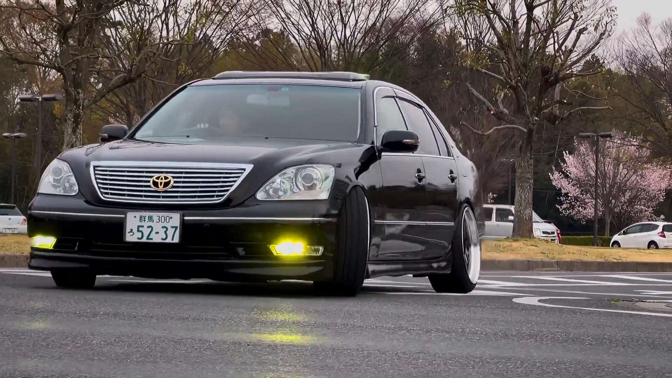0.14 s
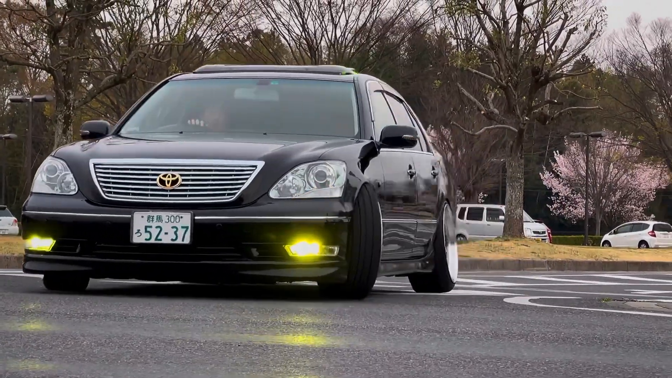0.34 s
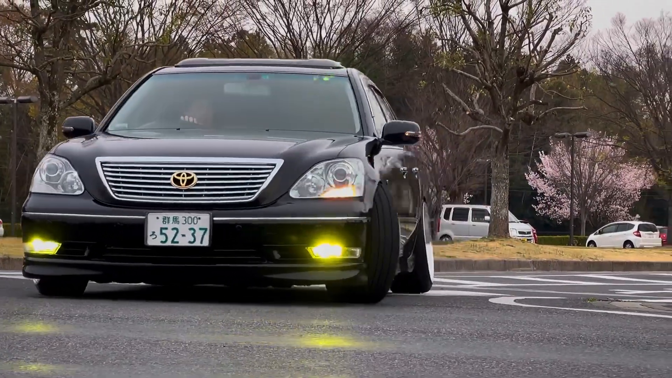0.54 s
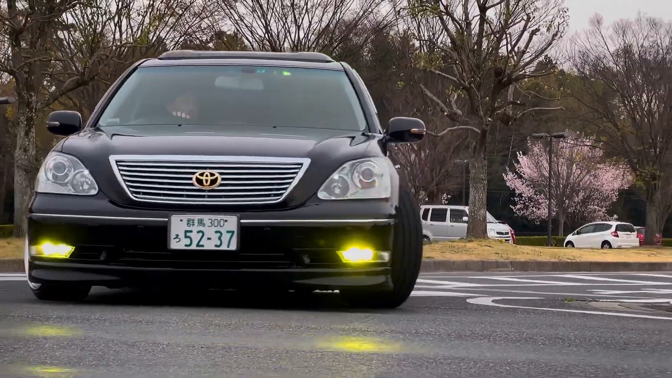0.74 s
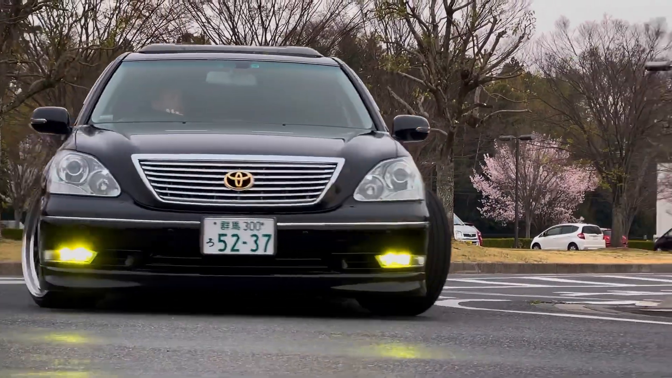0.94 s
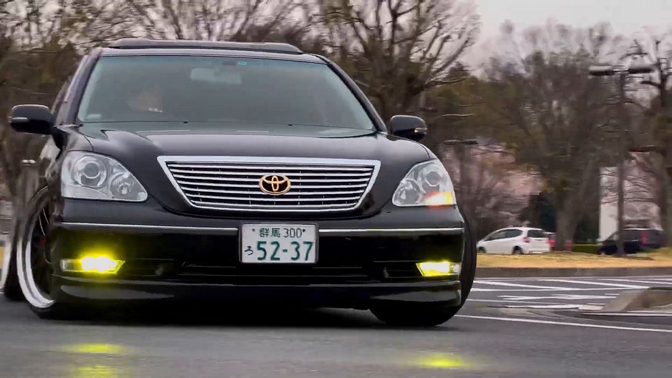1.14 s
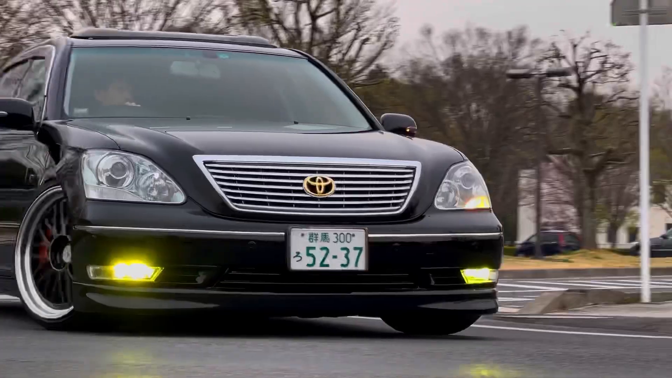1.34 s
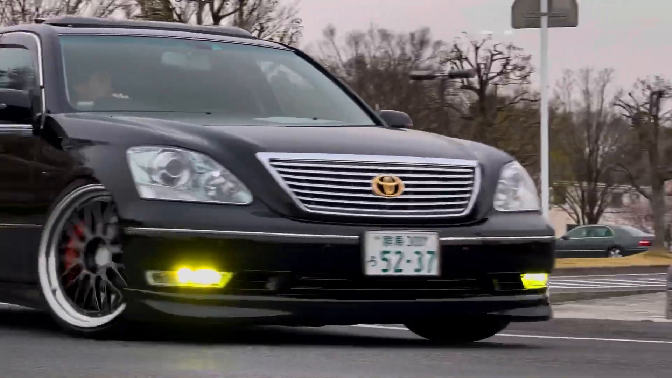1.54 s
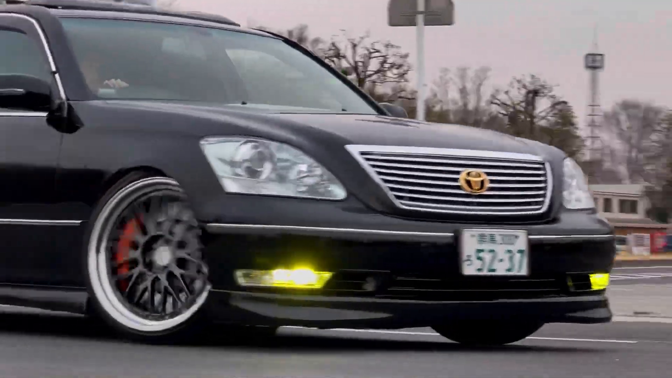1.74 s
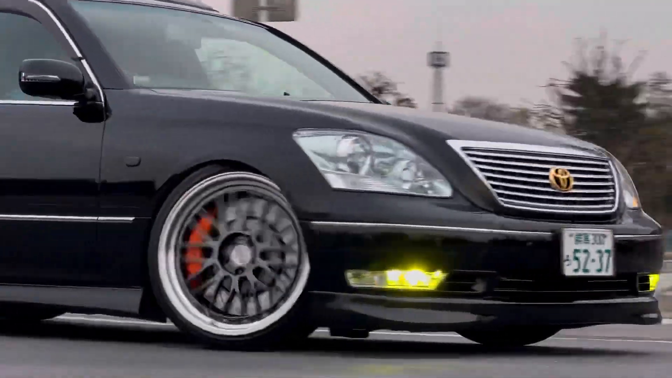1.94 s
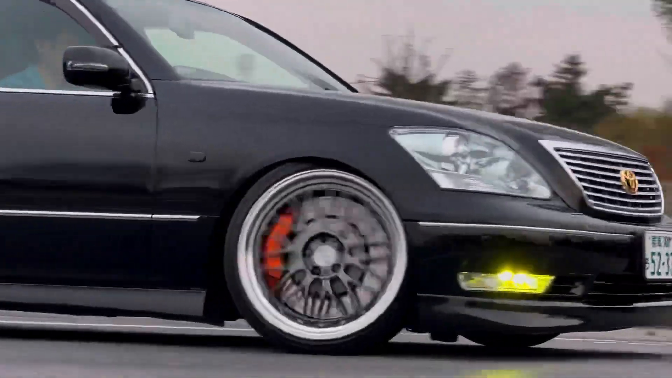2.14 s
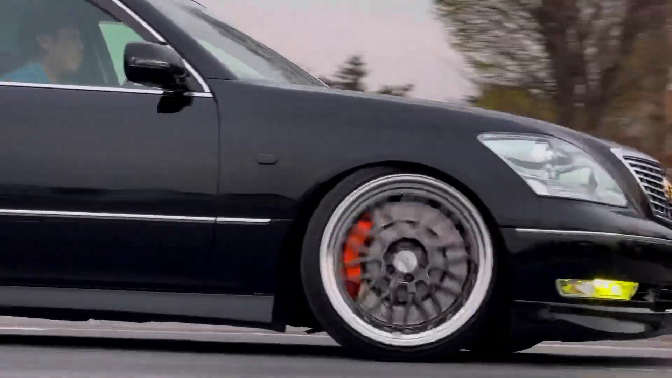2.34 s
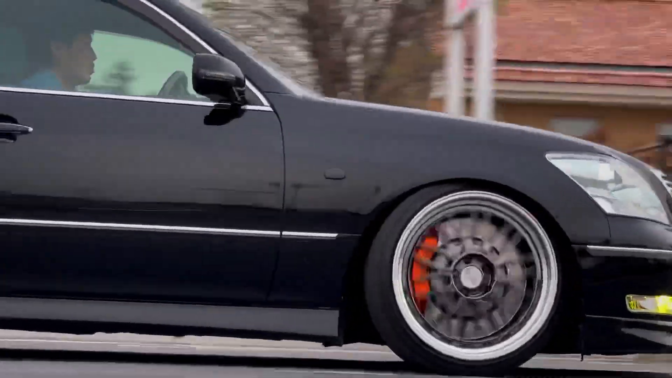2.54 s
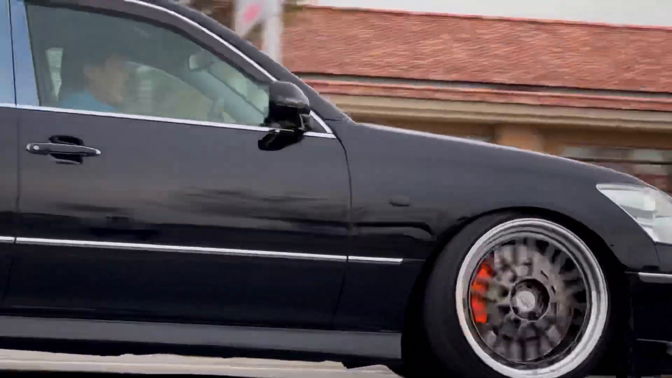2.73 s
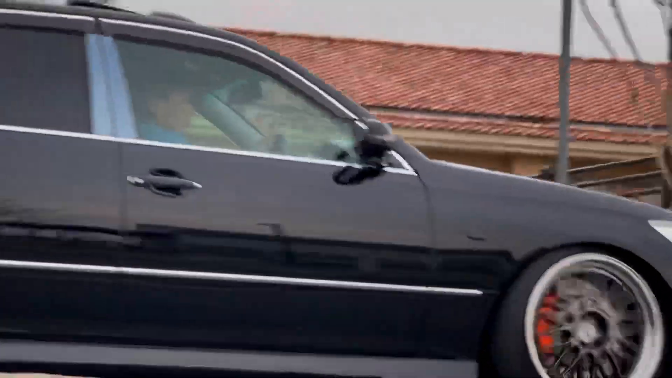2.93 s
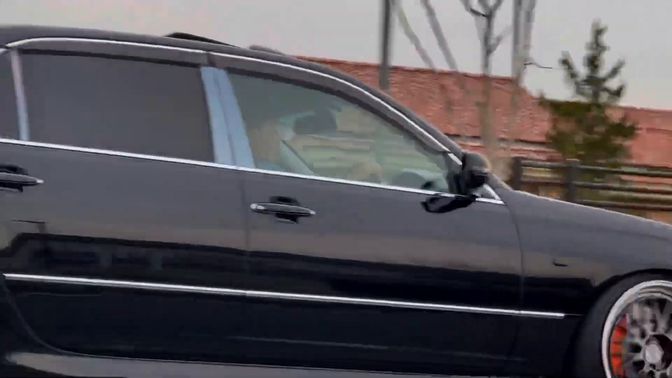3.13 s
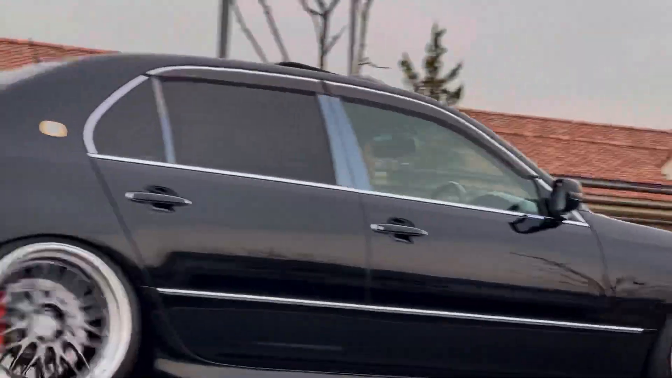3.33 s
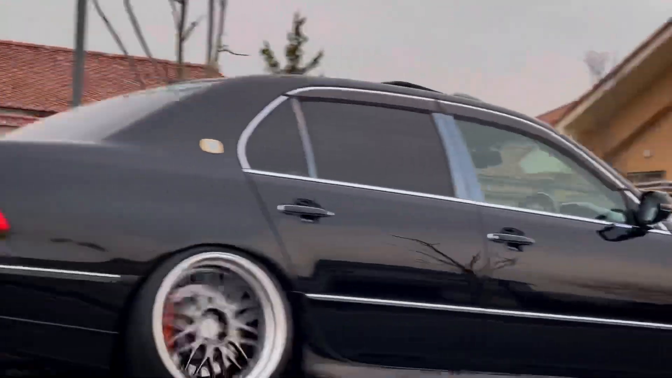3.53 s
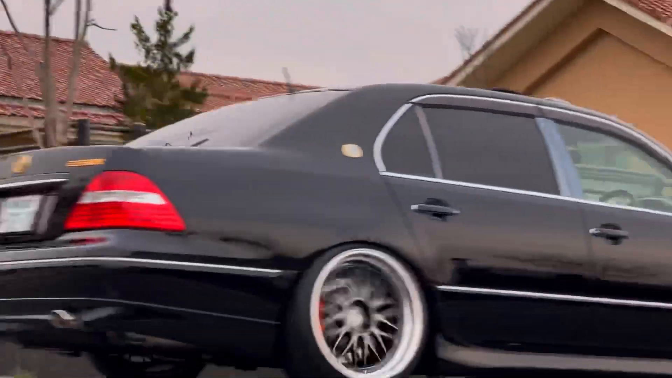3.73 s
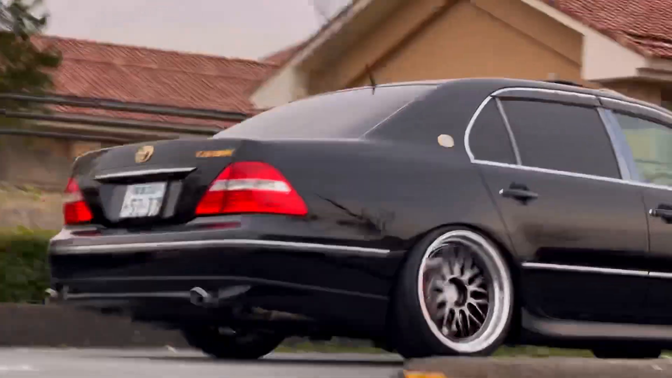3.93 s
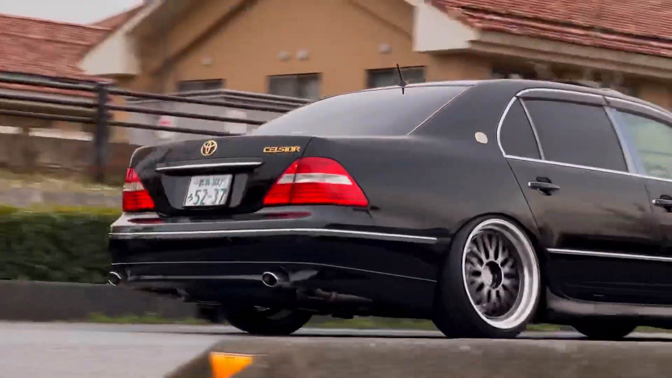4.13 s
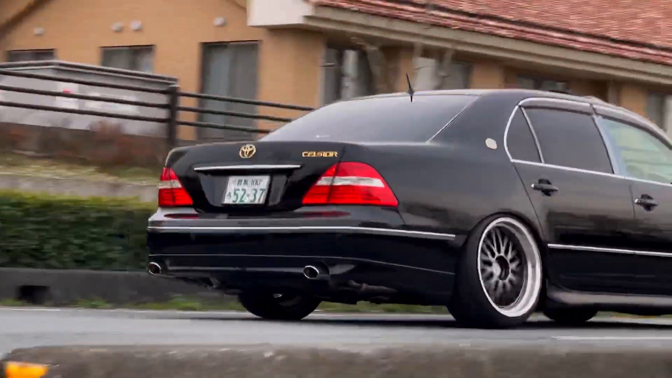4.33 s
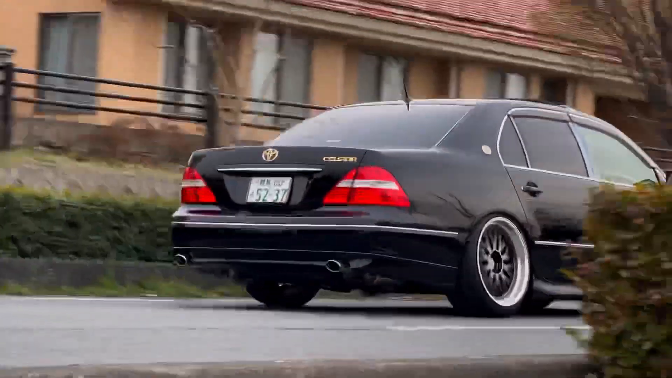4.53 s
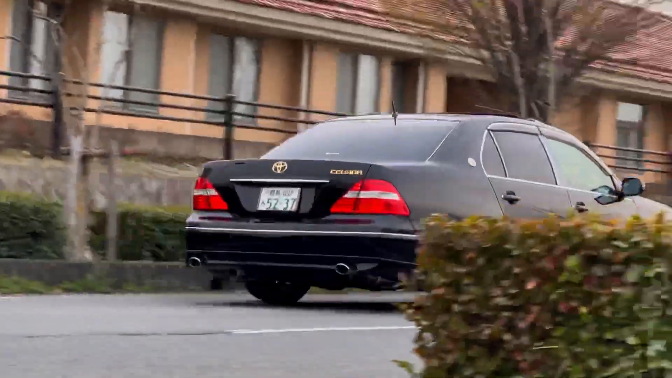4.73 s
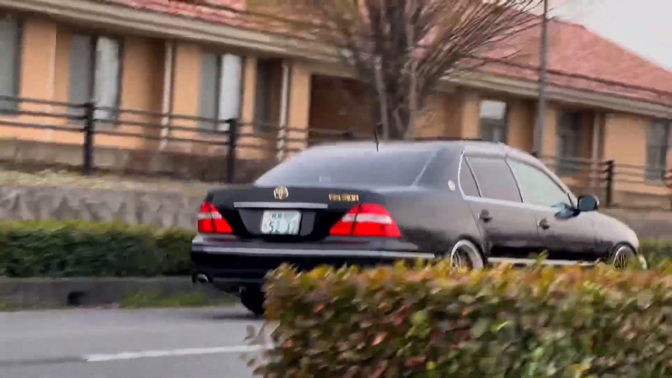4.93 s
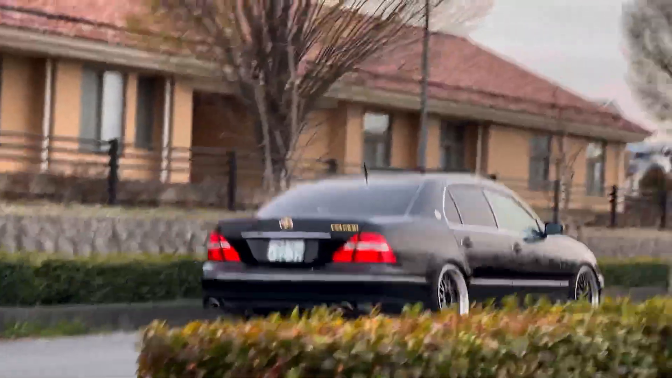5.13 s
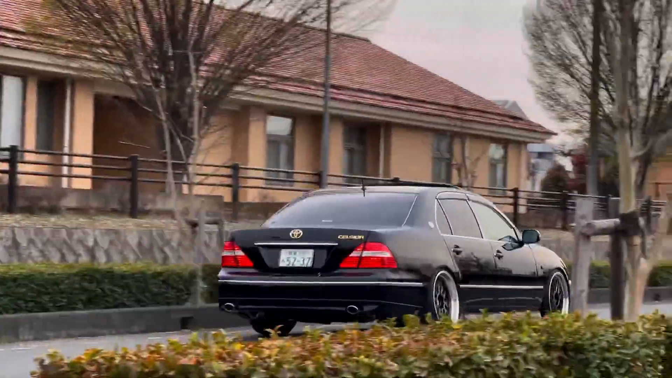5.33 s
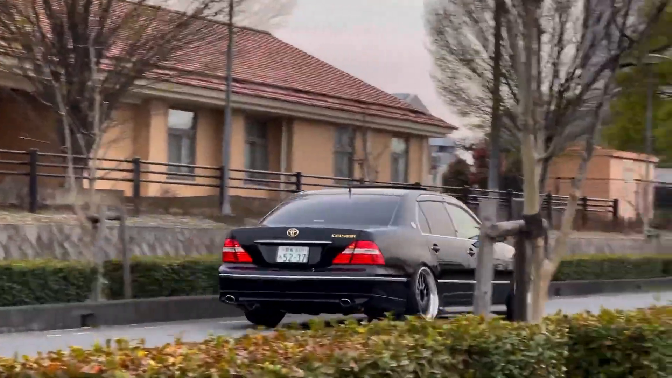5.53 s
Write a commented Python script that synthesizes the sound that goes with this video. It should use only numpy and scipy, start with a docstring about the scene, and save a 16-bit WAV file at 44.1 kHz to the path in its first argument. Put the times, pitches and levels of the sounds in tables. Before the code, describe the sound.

A big V8 saloon with a loud, deep exhaust burbles into view, passes close with hissing tyres, then howls away.

```python
"""A deep exhaust drone howls and swells as a V8 saloon pulls out, eases off, passes close by and accelerates away.
The drone is a sum of harmonics locked to the crank; pipe resonances colour its overtones as the revs sweep.
Unequal cylinders excite resonators that lope near idle, burble, growl and bark; double thumps beat alongside.
Filtered noise gives the whirr of the engine bay, gas rasping at the outlets, the hiss of the tyres and ticks of
grit; dull echoes return from house fronts and trees over a faint outdoor rumble."""
import sys
import numpy as np
from scipy import signal
from scipy.io import wavfile

SR = 44100
rng = np.random.default_rng(int(sys.argv[2]) if len(sys.argv) > 2 else 0)


def transcribe(u):
    """Save the signal u as a 16-bit wav file named by the first command-line argument.

    u: samples, shape (n,) or (channels, n), limited to [-1, 1]; the rate is SR.
    q: integer samples, one column per channel.
    """
    v = np.clip(np.atleast_2d(u).T, -1, 1)
    q = np.round(v * 32767).astype(np.int16)
    wavfile.write(sys.argv[1], SR, q)


N = 245637
TIME = np.arange(N) / SR

# firing rate as heard: time_s, rate_hz (firings per second)
FIRING_RATE = [(0.0, 73.1), (0.22, 62.5), (0.45, 67.26), (1.05, 84.89), (1.5, 95.73), (2.03, 102.89),
               (2.35, 113.34), (2.55, 116.35), (2.78, 113.26), (3.1, 100.94), (3.28, 101.79), (3.5, 111.69),
               (4.1, 120.52), (4.6, 127.39), (5.0, 131.33), (5.2, 130.92), (5.57, 139.32)]
# cylinders in firing order: strength_above_average (of the blow-down), exhaust_bank (0 or 1)
CYLINDER_BLOWDOWNS = [(0.024, 0), (0.07, 1), (0.022, 1), (-0.011, 0), (-0.065, 1), (0.045, 0), (0.084, 0),
                      (-0.00051, 1)]
# how hard the exhaust pulses push, heard in the overtones: time_s, push_db
EXHAUST_PUSH = [(0, -57.5), (1.05, -39), (1.75, -29), (2.2, -28), (2.45, -22.5), (3.0, -19.5), (3.8, -20),
                (4.4, -13.5), (4.8, -16.5), (5.25, -32), (5.57, -37.5)]
PUSH_REFERENCE_DB = -20
# the drive past at constant speed: time and distance of the closest approach
PASS_S, CLOSEST_M, SPEED_M_PER_S = 2.686, 8.67, 7.33
# the grille faces the listener briefly on the approach; the tailpipes swing into view after the pass
GRILLE_S, GRILLE_WIDTH_S = 1.78, 0.3
TAILPIPES_S, TAILPIPES_TURN_S = 3.24, 0.14
# house fronts throw the sound back as the car leaves
HOUSES_S, HOUSES_WIDTH_S = 5.34, 0.69


def from_db(db):
    """Amplitude ratio: 20 dB is a factor of ten."""
    return 10 ** (np.asarray(db) / 20)


def rms_one(x):
    """Normalization by the root of the mean power."""
    return x / np.sqrt(np.mean(x ** 2) + 1e-20)


def curve(rows):
    """Linear interpolation of a time curve at every sample."""
    return np.interp(TIME, *np.transpose(rows))


def at_hz(points, hz):
    """Interpolation of a spectrum on a logarithmic frequency axis."""
    at, value = np.transpose(points)
    return np.interp(np.log(hz), np.log(at), value)


def swell(at_s, width_s):
    """Gaussian envelope: a smooth rise to 1 and back."""
    return np.exp(-((TIME - at_s) / width_s) ** 2)


def band(x, hz, kind, order=2):
    """Butterworth filtering: a maximally flat passband."""
    corners = np.clip(hz, 10, 0.45 * SR)
    sos = signal.butter(order, corners, kind, fs=SR, output="sos")
    return signal.sosfilt(sos, x + 1e-18)


def drift(rate):
    """Low-passed random fluctuation of rms 1, changing about rate times a second."""
    step = 40  # samples between slow values
    r = np.exp(-2 * np.pi * step * rate / SR)
    white = rng.standard_normal(N // step + 2002)
    slow = signal.lfilter([1], [1, -2 * r, r * r], white)[2000:]
    return np.interp(np.arange(N) / step, np.arange(len(slow)), rms_one(slow))


def resonate(x, modes):
    """Modal superposition: damped two-pole resonators driven in parallel."""
    out = 0
    for hz, width, db in modes:
        r = np.exp(-np.pi * width / SR)
        poles = [1, -2 * r * np.cos(2 * np.pi * hz / SR), r * r]
        ringing = signal.lfilter([1, 0, -1], poles, x + 1e-18)
        out = out + from_db(db) * (1 - r * r) / 2 * ringing
    return out


def distance():
    """Geometry of a straight pass: metres from the car to the listener."""
    return np.hypot(CLOSEST_M, SPEED_M_PER_S * (TIME - PASS_S))


def heard(db, nearness, push=0, tail_db=0, houses_db=0):
    """Spreading loss and directivity: shares of distance and push, with lifts from tailpipes and house fronts."""
    loss_db = 20 * np.log10(distance() / CLOSEST_M)
    facing = 0.5 + 0.5 * np.tanh((TIME - TAILPIPES_S) / TAILPIPES_TURN_S)
    lift_db = tail_db * facing + houses_db * swell(HOUSES_S, HOUSES_WIDTH_S)
    push_db = push * (curve(EXHAUST_PUSH) - PUSH_REFERENCE_DB)
    return from_db(db - nearness * loss_db + push_db + lift_db)


def crank():
    """Phase as the integral of frequency: a running count of firings."""
    return np.cumsum(curve(FIRING_RATE)) / SR - 1 / 3


def from_strongest(fired):
    """Cyclic phase: firings since (+) or until (-) the nearest firing of the strongest cylinder."""
    cycle = len(CYLINDER_BLOWDOWNS)
    strongest = np.argmax(np.array(CYLINDER_BLOWDOWNS)[:, 0])
    return (fired - strongest + cycle / 2) % cycle - cycle / 2


def pipe_gain(hz):
    """Resonant transmission: the pipe's response to a heard pitch, its peaks sinking with the Doppler shift."""
    # pipe resonances: pitch_hz, width_hz, level_db
    pipe_modes = [(116.9, 14.7, 22), (147.6, 25, 8), (168.4, 19.3, 3.5), (194, 3.6, -2.5),
                  (239.1, 22, -12.5), (296.5, 36, -17.5), (384, 20, -11), (433, 12, -1.5), (457.4, 24, 5),
                  (505.4, 34, 5.5), (588.3, 31, 12.5), (633.3, 24, 10), (741, 63, 13.5), (881, 37, 26)]
    sound_m_per_s = 343
    grid = np.arange(100, 1100)
    power = 0
    for centre, width, db in pipe_modes:
        power = power + (from_db(db) / (1 + (2 * (grid - centre) / width) ** 2)) ** 2
    receding = np.gradient(distance()) * SR
    return np.interp(hz * (1 + receding / sound_m_per_s), grid, np.sqrt(power))


def drone(fired, flutter_db, waver):
    """Harmonic synthesis: tones locked to the crank, coloured by the pipe, with more flutter higher up."""
    # tone at the firing rate: time_s, level_db
    firing_tone = [(0.0, -33), (0.62, -27), (1.35, -12), (1.78, -18.5), (2.25, -10.5), (2.92, -17),
                   (3.3, -11), (3.43, -13), (3.52, -17), (3.83, -8), (4.1, -5.5), (4.69, -6), (5.35, -16.5),
                   (5.57, -14.5)]
    # overtones: order (multiple of the engine cycle of eight firings)
    orders = [5, 10, 13, 16, 18, 21, 24, 26, 28, 29, 30, 32, 34, 39, 40, 42, 48, 50, 53, 56]
    # for each order: relative_strength_db, house_reflection_db (gain or loss)
    strengths = [(-19.5, 8.5), (-23, 8.5), (-16.5, -14.5), (12, -4.5), (5, -2), (3.5, -20), (14.5, -12),
                 (4, 4), (-10, -17.5), (-4.5, -9.5), (-24.5, -19), (-9.5, 2), (-26.5, 18.5), (-39, 33.5),
                 (-24, 9), (-37.5, 29), (-27, -8.5), (-30, -0.5), (-41.5, -11), (-45.5, -6)]
    # brief howls as the revs pass a resonance: order, centre_s, half_length_s, level_db
    brief_howls = [(5, 3.1, 0.89, -36), (5, 5.8, 0.67, -30), (6, 4.6, .7, -44), (7, 2.6, .45, -34.5),
                   (7, 4.9, 0.3, -29.5), (9, 2.9, .55, -34), (10, 1.1, 0.3, -35), (10, 2.08, 0.23, -26.5),
                   (10, 4.7, 0.4, -35), (13, 0.85, 0.37, -36), (13, 1.76, .17, -29), (13, 1.8, 0.3, -34),
                   (16, 0.937, 0.22, -28), (16, 4.02, 0.22, -28.5), (17, 3.6, .18, -29.5),
                   (18, 3.45, 0.096, -29), (18, 4.75, 0.1, -34.5), (23, 4.65, 0.5, -32.5),
                   (25, 4.05, .22, -33.5), (25, 2.5, 0.49, -35), (26, 3.55, 0.14, -35),
                   (27, 4.85, 0.21, -34.5), (30, 3.9, .18, -34.5), (31, 4.6, 0.29, -34.5),
                   (40, 1.3, 0.095, -42.5), (40, 2.7, 0.44, -45), (40, 3.55, 0.11, -35),
                   (4, 5.4, 0.32, -39.5), (32, 2.46, .12, -38.5), (32, 2.69, 0.12, -38.5),
                   (32, 4.45, 0.33, -35), (49, 3.88, 0.12, -43.5), (48, 4.25, .12, -42),
                   (56, 4.4, .17, -41.5)]
    # weak firings as the engine picks up from idle: centre_s, half_length_s, level_change_db
    stumbles = [(0.05, 0.0077, -11), (0.097, .012, -7), (0.185, 0.023, -11), (0.25, 0.016, -4),
                (0.435, .025, -4), (0.528, 0.021, -5), (0.645, .018, -2)]
    rate, push_db = curve(FIRING_RATE), curve(EXHAUST_PUSH)
    reflected = swell(HOUSES_S, HOUSES_WIDTH_S)
    cycle = len(CYLINDER_BLOWDOWNS)

    lines = {cycle: from_db(curve(firing_tone))}
    for order, (db, houses_db) in zip(orders, strengths):
        source = from_db(db + push_db + houses_db * reflected - 4.5)
        lines[order] = source * pipe_gain(order / cycle * rate)
    for order, s, half, db in brief_howls:
        lines[round(order)] = lines.get(round(order), 0) + from_db(db) * swell(s, half)

    out = 0
    for order, gain in lines.items():
        k = order / cycle
        # offsets that grow as a square keep the crests apart
        phase = k * fired + (k - 1) ** 2 / 8
        phase = phase + waver * (k - 1) * drift(0.8)
        flutter = from_db(flutter_db * k * drift(46.0))
        out = out + np.sqrt(2) * gain * flutter * np.cos(2 * np.pi * phase)

    # at low revs the combustion is lumpy; it evens out as the engine pulls
    lumpy_db = np.interp(rate, [65, 75, 90], [0.8, 0.35, 0.15])
    stumble_db = sum(db * swell(s, half) for s, half, db in stumbles)
    return out * from_db(lumpy_db * drift(30) + stumble_db)


def throb(fired, puff_db, puff_firings):
    """Periodic pulses: close by, each cycle gives a sharp kick, then the strongest thump, with puffs of gas."""
    thump_db, thump_firings = -11.5, 0.25  # peak level and length scale
    kick_db, kick_firings, kick_lead_firings = -13.5, 0.14, 2
    late, early = from_strongest(fired), from_strongest(fired + kick_lead_firings)
    u, v = late / thump_firings, early / kick_firings
    thump = from_db(thump_db) * (1 - 2 * u ** 2) * np.exp(-u ** 2)
    kick = from_db(kick_db) * np.sqrt(2 * np.e) * v * np.exp(-v ** 2)
    gate = np.exp(-(late / puff_firings) ** 2) + np.exp(-(early / puff_firings) ** 2)
    gas = band(gate * rng.standard_normal(N), [280, 720], "band")
    alongside = swell(3, 0.91)
    return alongside * (thump + kick + from_db(puff_db) * rms_one(gas))


def chuffs(fired, ring_hz, decay_s):
    """Damped free vibration: at low revs one hard chuff per cycle sets the silencer ringing."""
    age_firings = from_strongest(fired + 1) % len(CYLINDER_BLOWDOWNS)
    age = age_firings / curve(FIRING_RATE)
    ring = np.exp(-age / decay_s) * np.sin(2 * np.pi * ring_hz * age)
    return from_db(-20.0) * swell(0.57, 0.31) * ring


def blowdowns(fired, common, scatter, bank_lag_s, lead):
    """Impulsive excitation: one click per firing, uneven between cylinders, later from the bank's longer pipe."""
    count = np.floor(fired + lead).astype(int)
    at = np.flatnonzero(np.diff(count)) + 1
    surplus, bank = np.array(CYLINDER_BLOWDOWNS)[count[at] % len(CYLINDER_BLOWDOWNS)].T
    chance = rng.standard_normal(N)[:len(at)]
    lag = (np.round(bank) * bank_lag_s * SR).astype(int)
    clicks = np.zeros(N)
    clicks[np.clip(at + lag, 0, N - 1)] = common + surplus + scatter * chance
    return clicks


def pipe_bounces(clicks, trip_s, keep, count=4):
    """Open-end reflection: each pulse runs up and down the pipe, inverted and weakened every trip."""
    return sum((-keep) ** k * np.interp(TIME - k * trip_s, TIME, clicks, left=0) for k in range(count))


def burble(fired, scatter):
    """Subharmonic excitation: unequal pulses leave the pipe directly and boom in the silencer."""
    # silencer resonances: pitch_hz, width_hz, level_db
    boom_modes = [(69, 57, 11.5), (123, 70, 3), (154, 19, -11.5)]
    pulses = blowdowns(fired, common=0, scatter=scatter, bank_lag_s=0, lead=0.15)
    boom = resonate(pulses, boom_modes) + 0.74 * pulses
    boom = band(band(boom, 60.6, "high", order=6), 293, "low", order=3)
    return heard(-29.5, nearness=0.48, push=0.13, tail_db=1.0, houses_db=8.5) * rms_one(boom)


def growl(fired, scatter):
    """Forced resonance: bouncing unequal pulses ring the exhaust, with a lope near idle."""
    # exhaust resonances: pitch_hz, width_hz, level_db
    low_modes = [(230, 130, 6), (268, 34, -21.5), (440, 890, 4.5), (476, 13, -3)]
    pulses = blowdowns(fired, common=0, scatter=scatter, bank_lag_s=0.00048, lead=0.19)
    ringing = resonate(pipe_bounces(pulses, trip_s=0.01005, keep=0.18), low_modes)
    ringing = band(ringing, [190, 550], "band", order=3)
    # near idle each cylinder's chuff stands out
    lope = from_db(9.1 * swell(0.08, 0.28))
    return heard(-39.0, nearness=0.99, push=0.13, tail_db=13.5, houses_db=5.5) * lope * rms_one(ringing)


def bark(fired, scatter):
    """Forced resonance and screening: hard pulses ring the exhaust, dulled as the car leaves behind the hedge."""
    # exhaust resonances: pitch_hz, width_hz, level_db
    high_modes = [(647, 11, -2), (691, 73, 3), (810, 56, 5), (836, 67, -8.5)]
    pulses = blowdowns(fired, common=0.042, scatter=2 * scatter, bank_lag_s=0.00088, lead=0.15)
    ringing = resonate(pipe_bounces(pulses, trip_s=0.00489, keep=0.43), high_modes)
    ringing = band(ringing, [520, 1000], "band", order=3)
    dulled = from_db(-4.0) * rms_one(band(ringing, 510, "low", order=3))
    screened = np.interp(TIME, [4.55, 5.0], [0, 1])
    mixed = (1 - screened) * rms_one(ringing) + screened * dulled
    return heard(-44.5, nearness=1.14, push=1.0, tail_db=13.5, houses_db=4.0) * mixed


def gas_flow(fired, depth, surge):
    """Amplitude modulation: the jet swells at every firing, most at the strongest cylinders."""
    cylinder = np.round(fired).astype(int) % len(CYLINDER_BLOWDOWNS)
    surplus = np.array(CYLINDER_BLOWDOWNS)[cylinder, 0]
    puff = np.cos(np.pi * fired) ** 4
    return rms_one(1 + puff * (depth + surge * surplus))


def rasp(fired, jet_db):
    """Jet turbulence and resonance: sharp pulse edges and pulsed noise ring the tailpipe tips."""
    # resonances of the tips: pitch_hz, width_hz, level_db
    tip_modes = [(1344, 130, 1.5), (1518, 100, 2), (1710, 300, -6), (2200, 190, -13)]
    edges = rms_one(blowdowns(fired, common=0.54, scatter=1.0, bank_lag_s=0.00065, lead=0.1553))
    jet = from_db(jet_db) * gas_flow(fired, depth=0.3, surge=5.1) * rng.standard_normal(N)
    return rms_one(band(resonate(edges + jet, tip_modes), [1100, 2600], "band", order=3))


def tip_rings(fired, width_hz):
    """Narrow-band noise: rough tones that follow the revs and pulse with the gas flow."""
    # a high overtone meets a resonance of the tips: centre_s, half_length_s, firing_rate_multiple, level_db
    rings = [(3.52, .09, 13.7, -40.5), (3.796, 0.21, 13.7, -37.5), (3.871, 0.11, 11.25, -36.5),
             (3.847, 0.22, 19.5, -47), (4.078, .12, 15.2, -43), (4.116, 0.099, 18.6, -44.5),
             (4.199, 0.11, 12.5, -41.5)]
    out = 0
    for s, half, multiple, db in rings:
        a, b = rms_one(band(rng.standard_normal((2, N)), width_hz, "low"))
        phase = 2 * np.pi * multiple * fired
        out = out + from_db(db) * swell(s, half) * (a * np.cos(phase) + b * np.sin(phase))
    return out * gas_flow(fired, depth=1.1, surge=1.6)


def engine_bay():
    """Cavity resonance: fan, belts and intake air whirr under the bonnet, strongest through the grille."""
    # resonances of the engine bay: pitch_hz, width_hz, level_db
    bay_modes = [(961, 85, 12.5), (1440, 1600, 0.5), (1780, 460, 0.5), (2000, 660, -15)]
    whirr = resonate(rng.standard_normal(N), bay_modes)
    whirr = rms_one(band(whirr, [800, 2700], "band", order=3))
    grille = from_db(8.8 * swell(GRILLE_S, GRILLE_WIDTH_S))
    hiss = rms_one(band(rng.standard_normal(N), [4500, 7500], "band"))
    intake_hiss = from_db(-58.0) * swell(GRILLE_S, 0.82) * hiss
    # the intake draws harder as the throttle first opens
    draw = from_db(3.0 * swell(1.2, 0.29))
    return heard(-43.5, nearness=0.99, tail_db=2.0, houses_db=8.0) * draw * grille * whirr + intake_hiss


def noise(spectrum, patchy_db):
    """Band synthesis: about third-octave bands of partly correlated stereo noise, each flickering; rms 1."""
    # left-right correlation: pitch_hz, correlation (-1 to 1)
    likeness = [(50, 0.77), (150, 0.88), (1000, 0.66), (2200, 1), (4000, 0.82), (6500, 1), (8800, 0.11),
                (10500, 1)]
    low, high = spectrum[0][0], spectrum[-1][0]
    edges = np.geomspace(low, high, int(3 * np.log2(high / low)) + 2)
    white, out = rng.standard_normal((2, 2, N)), 0
    for k, pair in enumerate(zip(edges, edges[1:])):
        mid, side = band(white[k % 2], pair, "band")
        hz = np.sqrt(np.prod(pair))
        alike = np.clip(at_hz(likeness, hz), -1, 1)
        gain = from_db(at_hz(spectrum, hz) + patchy_db * drift(40))
        stereo = np.sqrt(1 + alike) * mid + np.sqrt(1 - alike) * side * [[1], [-1]]
        out = out + gain * stereo
    return rms_one(out)


def tyres():
    """Broadband rolling noise: roar and sizzle of the tread, softer behind a hedge, with a crunch on grit."""
    # noise spectra of tread roar, crunch and sizzle: pitch_hz, level_db (per hertz, before scaling to rms 1)
    roar_spectrum = [(45, 8.5), (100, 25), (250, 23.5), (450, 18.5), (700, 17), (1200, 8.5), (2000, -12),
                     (3000, -2.5), (5000, -6.5), (7000, -15), (9000, -23.5)]
    crunch_spectrum = [(2500, 3.5), (3500, 0.5), (5000, -17), (7000, -15.5), (9000, -9), (12000, -8)]
    sizzle_spectrum = [(5500, -11.5), (7000, -5), (8800, 8), (11400, 4.5), (12200, -21.5), (15000, -32)]
    # gritty stretches of road: centre_s, half_length_s, level_db
    gritty_stretches = [(4.613, 0.097, -48), (4.848, 0.22, -50.5), (5.485, 0.041, -47.5)]
    gritty = sum(from_db(db) * swell(s, half) for s, half, db in gritty_stretches)
    hedge = swell(5.23, 0.19)

    roar_gain = heard(-28.5, nearness=0.72, push=0.019, tail_db=-0.5, houses_db=1.0) * from_db(-3 * hedge)
    roar = roar_gain * noise(roar_spectrum, patchy_db=1.0)
    # the tread's hum beams sideways and is weaker while the car still faces the listener
    roar = roar - np.interp(TIME, [1.7, 2.3], [0.5, 0]) * band(roar, [540, 850], "band", order=1)

    approach = from_db(2.4 * swell(GRILLE_S, 0.45))
    sizzle_gain = heard(-50, nearness=1.39, tail_db=2.0, houses_db=-1.0) * approach * from_db(-8 * hedge)
    sizzle = sizzle_gain * noise(sizzle_spectrum, patchy_db=1.5)
    # the roar is quieter at first
    early = from_db(np.interp(TIME, [0.6, 1.9], [-3.5, 0]))
    return early * roar + sizzle + gritty * noise(crunch_spectrum, patchy_db=2.5)


def grit(decay_s, spread):
    """Transient radiation: stones snap as very short decaying noise bursts, each around its own pitch."""
    # single stones under a tyre: start_s, relative_peak_db, pitch_hz
    stones = [(1.247, -32.5, 5660), (4.420, -37, 3350), (4.436, -30, 5000), (4.444, -27, 5000),
              (4.549, -34.5, 3480), (4.582, -47, 7000), (4.609, -31, 3750), (4.618, -39, 4330),
              (4.637, -32, 7070), (4.667, -28, 7500), (5.397, -43, 6500), (5.451, -32.5, 6540),
              (5.479, -30.5, 4400), (5.487, -40, 4800), (5.505, -37, 6000), (5.512, -35, 7030),
              (5.523, -38, 7500), (5.533, -40, 7500), (5.547, -31.5, 6000)]
    out = np.zeros((2, N + SR))
    age = np.arange(SR // 50) / SR
    for s, db, hz in stones:
        # mostly common to both sides
        burst = rng.standard_normal(len(age)) + 0.17 * rng.standard_normal((2, len(age)))
        snap = band(burst * np.exp(-age / decay_s), [hz / (1 + spread), hz * (1 + spread)], "band")
        i = round(s * SR)
        out[:, i:i + len(age)] += from_db(db) * snap / np.abs(snap).max()
    return out[:, :N]


def roadside(x):
    """Discrete reflections: a few dull echoes, with different delays on each side."""
    # house fronts and trees: left_delay_s, right_delay_s, level_db
    reflections = [(.031, 0.031, -6), (0.074, 0.062, -18), (.127, .139, -32.5)]
    dull = band(x, 1500, "low")
    out = 0
    for *lags, db in reflections:
        sides = [np.interp(TIME - lag, TIME, dull, left=0) for lag in lags]
        out = out + from_db(db) * np.array(sides)
    return out


def air():
    """Low-frequency noise: a faint steady outdoor rumble, swelling as the car's wake reaches the listener."""
    rumble = rms_one(band(rng.standard_normal(N), [38, 55], "band", order=4))
    return (from_db(-48.0) + from_db(-41.0) * swell(3.7, 0.4)) * rumble


def scene():
    """Superposition of exhaust, engine bay, tyres, echoes and outdoor air."""
    fired = crank()
    beats = throb(fired, puff_db=-40.0, puff_firings=0.35) + chuffs(fired, ring_hz=143.6, decay_s=0.016)
    tone = drone(fired, flutter_db=0.15, waver=0.004) + beats
    scatter = 0.03  # chance in each blow-down
    uneven = burble(fired, scatter) + growl(fired, scatter) + bark(fired, scatter)
    outlets = heard(-46.0, nearness=1.0, push=0.042, tail_db=10.5, houses_db=5) * rasp(fired, jet_db=13.0)
    bay = engine_bay() * gas_flow(fired, depth=0.42, surge=5.1)
    rough = uneven + outlets + bay
    exhaust = tone + rough + roadside(rough) + tip_rings(fired, width_hz=60)
    road = tyres() + from_db(2.0) * grit(decay_s=0.001, spread=0.66)
    return exhaust + road + air()


def record(dry):
    """Linear filtering and saturation: left a touch later and softer, a treble notch, rounded peaks, the top cut."""
    x = np.array([np.append(0, dry[0, :-1]), dry[1]]) * from_db([[-0.15], [0.15]])
    x = signal.lfilter(*signal.iirnotch(10300, 6, fs=SR), x)
    rounded = x / (1 + x ** 16) ** (1 / 16)
    cutoff_hz = 14000
    return signal.sosfilt(signal.cheby2(12, 70, cutoff_hz, fs=SR, output="sos"), rounded)


dry = scene()
out = record(dry)
transcribe(out)
```